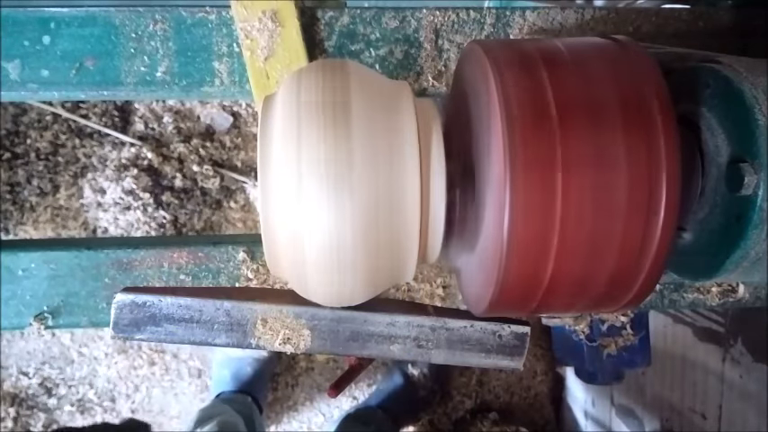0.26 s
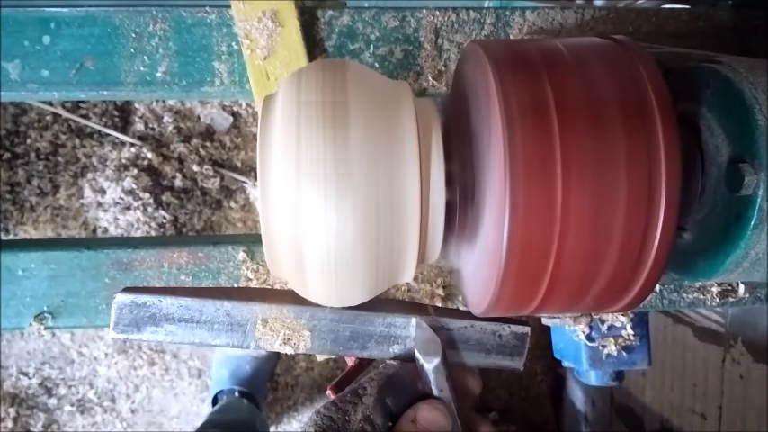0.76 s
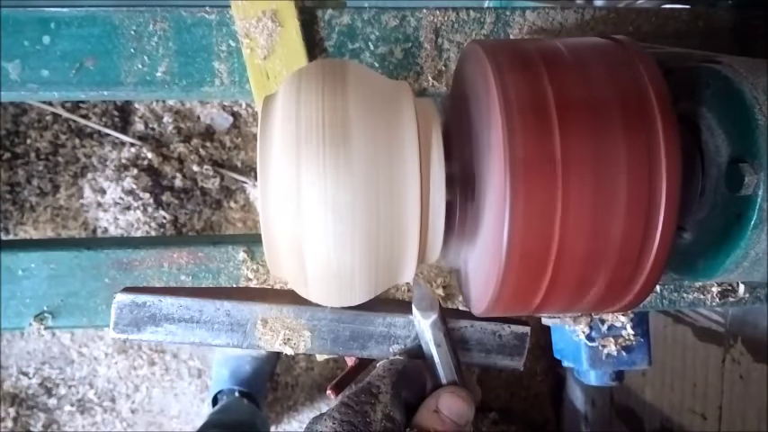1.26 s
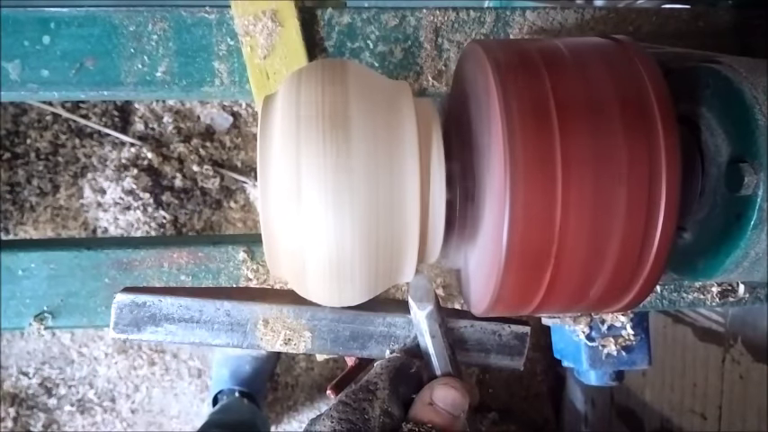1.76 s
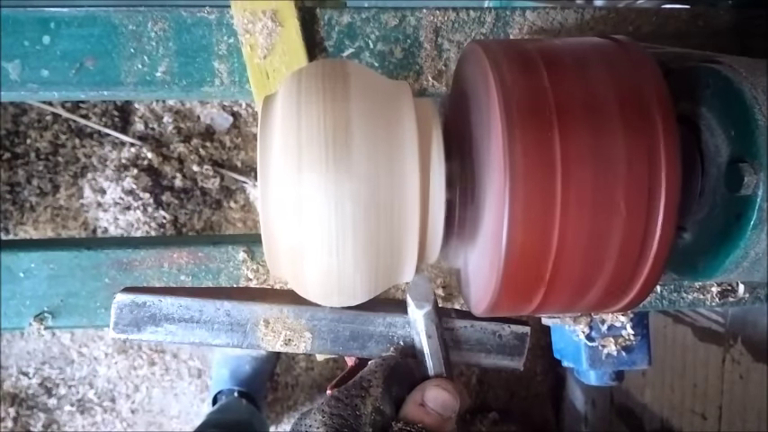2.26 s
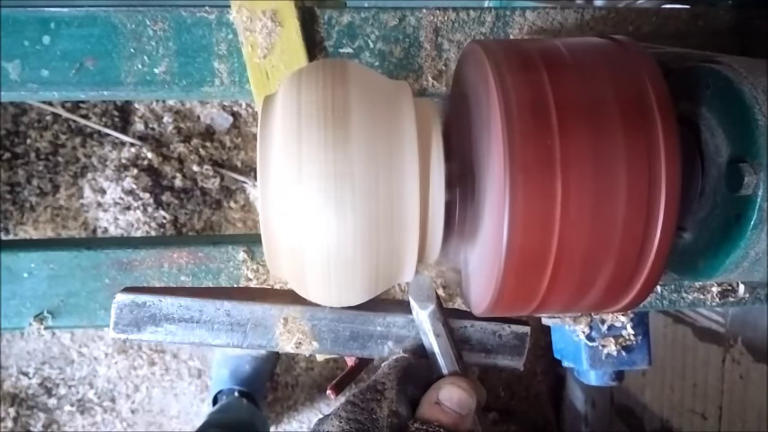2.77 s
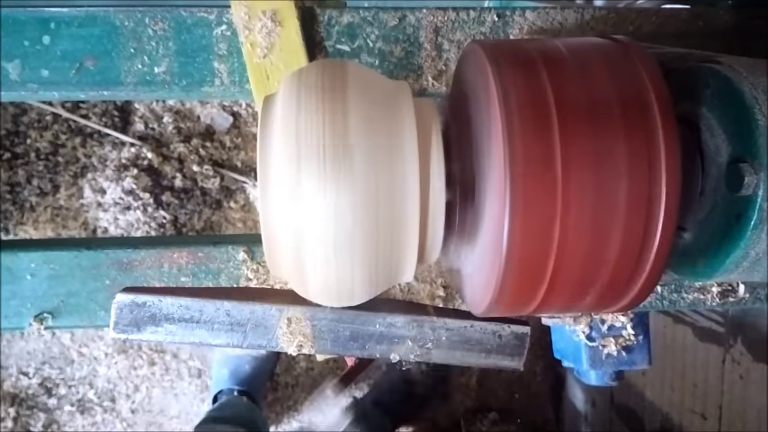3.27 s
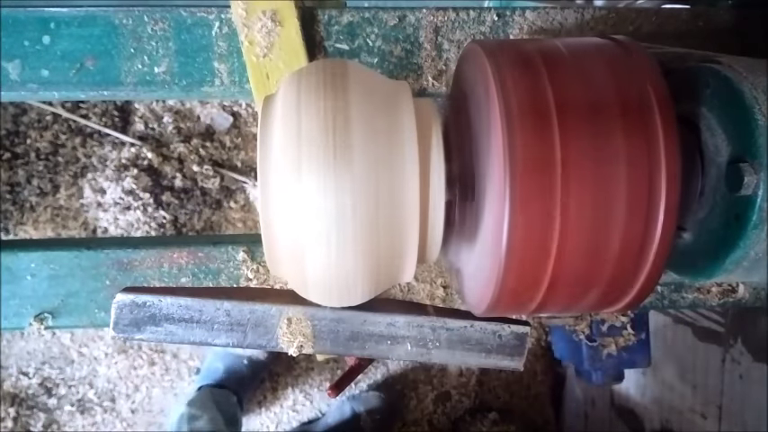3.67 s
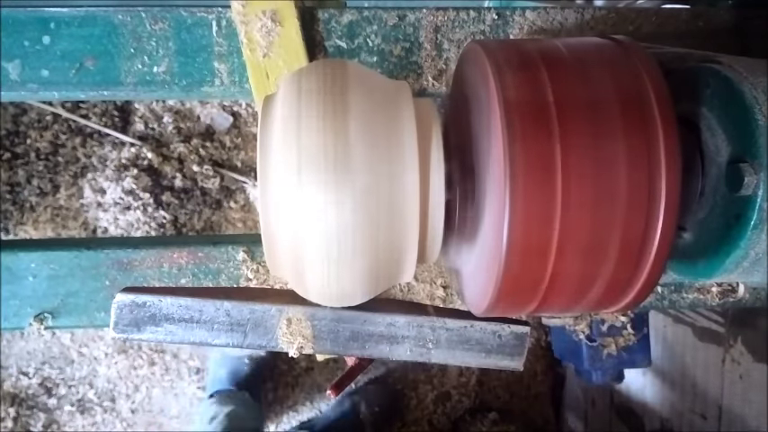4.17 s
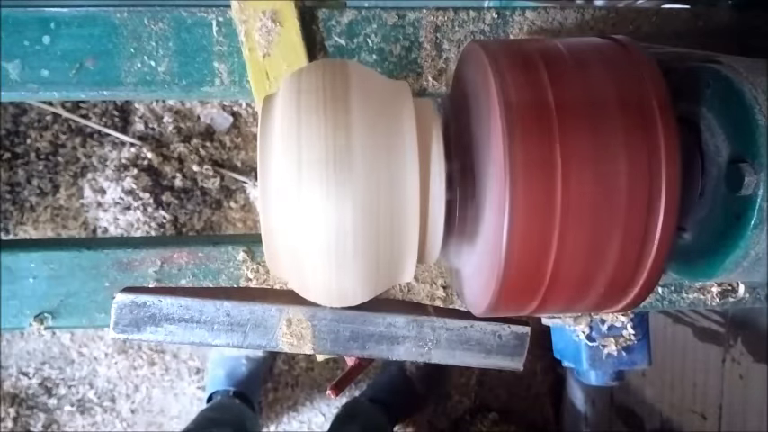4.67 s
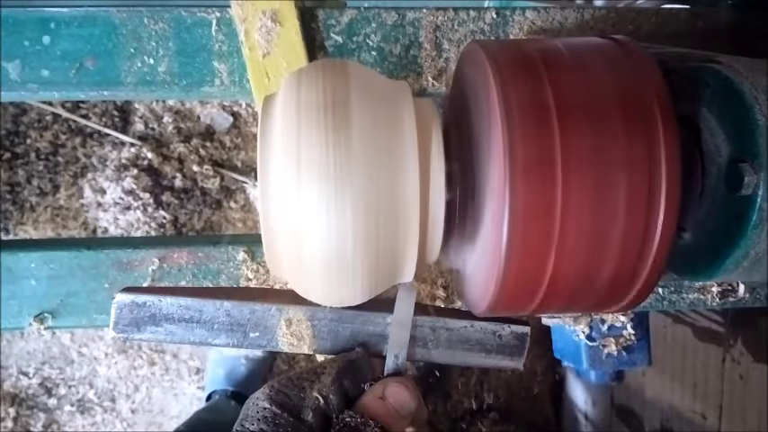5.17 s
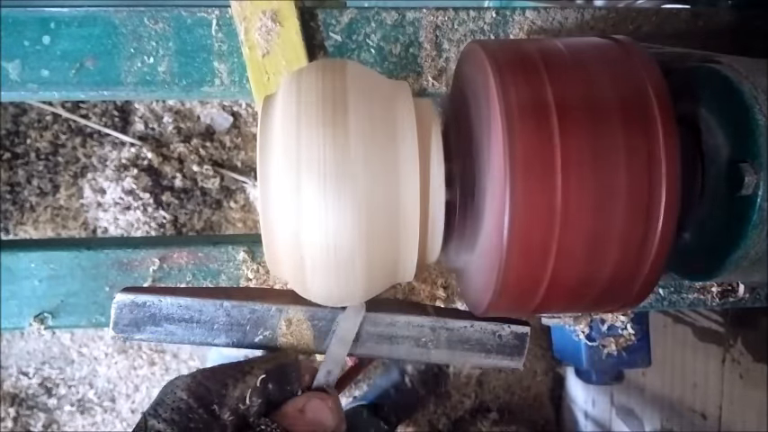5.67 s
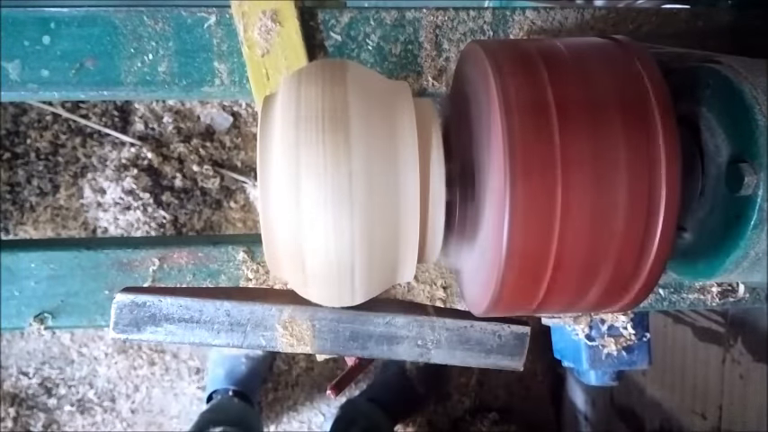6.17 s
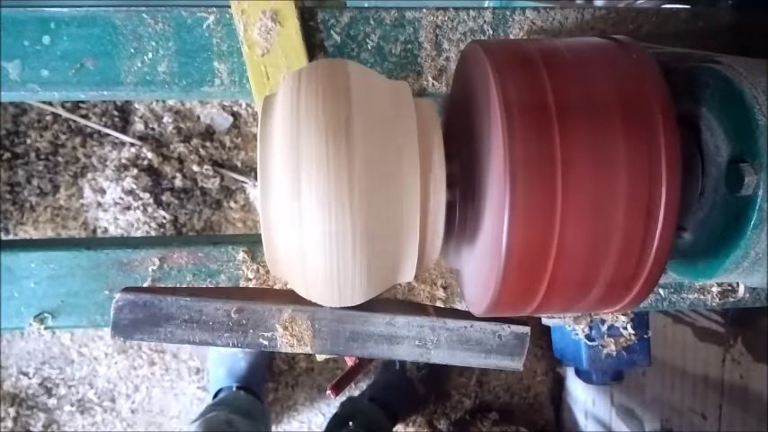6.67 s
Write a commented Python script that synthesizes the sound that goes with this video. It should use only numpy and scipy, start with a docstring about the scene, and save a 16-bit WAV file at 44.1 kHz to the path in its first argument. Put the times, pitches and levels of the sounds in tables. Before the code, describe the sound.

A wood lathe runs close by in a small workshop, its motor humming and whining and a worn bearing rattling with a hiss. A steel tool scrapes the spinning wood in a string of short, raspy strokes. After a pause and a tiny snap, a thinner blade rasps and squeals briefly. Near the end the power cuts and the lathe begins to slow with two faint squeaks.

```python
"""Wood lathe in a small workshop

A stereo pair of microphones hears a belt-driven lathe: the motor hums and whines, a worn bearing
rattles and sings. A steel scraper meets the spinning wood in short strokes, rasping once per turn and
chattering where it digs in. The machine's hiss flares briefly on the beat of spindle and pulley, a chip
snaps, and a thinner blade takes over and squeals. Near the end the power is cut and the spindle coasts
down with two squeaks."""
import sys
import numpy as np
from scipy import signal
from scipy.fft import rfft, irfft, next_fast_len
from scipy.io import wavfile
from scipy.ndimage import uniform_filter1d

SR = 44100
rng = np.random.default_rng(int(sys.argv[2]) if len(sys.argv) > 2 else 0)


def wav_record(signal):
    """Record a signal, one row per channel, as 16-bit PCM in the file named by sys.argv[1]."""
    frames = np.transpose(np.atleast_2d(signal))
    bounded = np.clip(frames, -1, 1)
    # unit amplitude maps onto the largest positive 16-bit level
    quanta = np.round(bounded * 32767).astype(np.int16)
    wavfile.write(sys.argv[1], SR, quanta)


N = 305167
TIME = np.arange(N) / SR
FFT_SIZE = next_fast_len(N, True)
FREQS = np.maximum(np.fft.rfftfreq(FFT_SIZE, 1 / SR), 1)
SPINDLE_HZ, PULLEY_HZ, BALL_PASS_HZ = 74.8, 66.35, 171.6   # at full speed
POWER_OFF_S, COAST_S = 6.453, 1.6   # the power is cut; time constant of the slowing


def from_db(db):
    """Decibels to gain."""
    return 10 ** (np.asarray(db) / 20)


def rms_one(x):
    """Scale to unit power."""
    return x / np.sqrt(np.mean(x ** 2) + 1e-20)


def at_hz(points):
    """A curve through the points, at every frequency."""
    hz, value = np.transpose(points)
    return np.interp(np.log(FREQS), np.log(hz), value)


def drift(rate_hz):
    """A slow random wander of spread 1."""
    step, run_in = 40, 2000
    pole = np.exp(-2 * np.pi * rate_hz * step / SR)
    noise = rng.standard_normal(N // step + run_in + 2)
    slow = signal.lfilter([1], [1, -2 * pole, pole * pole], noise)[run_in:]
    return np.interp(np.arange(N) / step, np.arange(len(slow)), rms_one(slow))


def swell(at_s, half_width_s):
    """A bell-shaped bump of height 1."""
    return np.exp(-.5 * ((TIME - at_s) / half_width_s) ** 2)


def body(spectrum, resonances=()):
    """Gain per frequency: a broad slope with resonant peaks on it."""
    peaks = sum((from_db(db) ** 2 - 1) / (1 + (2 * (FREQS - hz) / width) ** 2)
                for hz, width, db in resonances)
    return from_db(at_hz(spectrum)) * np.sqrt(np.maximum(1 + peaks, .1))


def modes(resonances):
    """Gain per frequency of a few resonances with dark valleys between them."""
    return np.sqrt(sum(from_db(db) ** 2 / (1 + (1.26 * (FREQS - hz) / width) ** 2) ** 2
                       for hz, width, db in resonances))


def friction(per_s, spread_db):
    """Two streams of tiny impacts of uneven size, with unit power per Hz."""
    hits = rng.random((2, N)) < per_s / SR
    sizes = from_db(spread_db * rng.uniform(-0.96, 1, (2, N))) * rng.standard_normal((2, N))
    return rms_one(hits * sizes) * np.sqrt(SR / 2)


def turns(hz, speed, wobble):
    """Revolutions made so far at a slightly unsteady speed."""
    return np.cumsum(hz * speed * (1 + wobble * drift(3.05))) / SR


def once_per_turn(angle, sharpness, depth):
    """A gain of unit power that jumps up once in every revolution and dies away."""
    return rms_one(1 + depth * np.exp(-sharpness * (angle % 1)))


def tones(lines, angle, rough, flutter_hz):
    """Partials locked to a rotation, shaken in level and phase: a direct stream and a scattered one."""
    out = np.zeros((2, N))
    for multiple, db in lines:
        phase = 2 * np.pi * (multiple * angle + rng.random())
        along, across = np.cos(phase), np.sin(phase)
        direct = (1 + rough * drift(flutter_hz)) * along + rough * drift(flutter_hz) * across
        scattered = drift(flutter_hz) * along
        out += np.sqrt(2) * from_db(db) * np.array([direct / np.sqrt(1 + 2 * rough ** 2), scattered])
    return out


# how alike the two microphones sound: (frequency [Hz], likeness [ratio, capped at 1])
MIC_LIKENESS = [(60, 1.1), (400, 0.9), (1300, 1), (2000, 1), (2600, 1), (3000, 0.44), (3800, 0.3),
                (5600, .5), (6400, 0), (16000, 0)]
# balance across the pair: (frequency [Hz], left minus right [dB])
MIC_BALANCE = [(60, -2), (350, 2.5), (700, 1), (2100, 1.5), (2650, -2.5), (3300, 4.5), (5500, 0),
               (7500, 2.5), (10000, -.5), (13000, 0.5), (14400, -3), (16000, 4.5)]
# phase lag at the left microphone: (frequency [Hz], lag [rad])
MIC_LEFT_LAG = [(60, -2), (500, 0.07), (1200, 0.3), (1720, 0.47), (2600, 1.45), (3300, 1.8), (4300, 2.5),
                (6000, 3)]

def radiate(force, gain):
    """Two force streams ring a body and reach the microphones, alike in the bass, diffuse in the treble."""
    mid, side = rfft(force, FFT_SIZE) * gain
    alike = np.clip(at_hz(MIC_LIKENESS), -1, 1)
    sign = np.array([[1], [-1]])   # left, right
    pair = np.sqrt((1 + alike) / 2) * mid + sign * np.sqrt((1 - alike) / 2) * side
    placing = from_db(sign * at_hz(MIC_BALANCE) / 2) * np.exp(-1j * sign * at_hz(MIC_LEFT_LAG) / 2)
    return irfft(pair * placing, FFT_SIZE)[:, :N]


def workshop(x, wet_db, t60):
    """Dense reflections from lathe bed, floor and nearby walls, different at each microphone."""
    age = np.arange(SR // 3) / SR
    echoes = rng.standard_normal((2, len(age))) * from_db(-60 * age / t60) * (age > .002)
    echoes *= from_db(wet_db) / np.sqrt(np.sum(echoes ** 2, axis=1, keepdims=True))
    return (x + signal.fftconvolve(x, echoes, axes=1)[:, :N]) / np.hypot(1, from_db(wet_db))


# hum of motor and drive: (frequency [Hz], level [dB])
MOTOR_HUM = [(133, -89), (324.2, -66), (333, -72), (379, -71), (400.1, -60), (467, -65.5), (475.6, -68),
             (526, -84), (532.5, -62), (541, -72), (627, -76.5), (665, -73.5), (686, -78), (800.2, -68.5),
             (866, -73.5), (932, -75.5), (1124.5, -66.5), (1475, -75), (1609, -75)]
# the motor's whine: (frequency [Hz], level [dB])
MOTOR_WHINE = [(1200.3, -61)]
# swells of the whine: (time [s], rise [dB])
WHINE_SURGES = [(.25, 6.5), (1.45, 6), (2.9, 3), (3.9, 4), (5.2, 3.5), (5.87, 5.5)]
# casing resonance that the whine excites: (frequency [Hz], width [Hz], level [dB])
CASING_MODES = [(1199, 42, -79.5)]
HUM_DIP_DB, HUM_DIP_S = 2.5, 0.23   # the hum sinks under the scraper; time it takes to follow

def motor(speed):
    """Hum and whine last while the power is on and end in a short low groan; cutting damps the hum."""
    powered = np.clip((POWER_OFF_S - TIME) / .04, 0, 1)
    angle = turns(1, speed, wobble=0.001005)
    cutting = uniform_filter1d(from_db(pressure_db()), size=int(HUM_DIP_S * SR))
    dip = from_db(0.46 - HUM_DIP_DB * cutting / cutting.max())
    hum = tones(MOTOR_HUM, angle, rough=0.21, flutter_hz=9.8) * dip
    surge = from_db(-3.5 + sum(db * swell(at_s, .19) for at_s, db in WHINE_SURGES))
    whine = tones(MOTOR_WHINE, angle, rough=0.7, flutter_hz=9.3) * surge
    groan = from_db(-46) * swell(6.455, 0.0148) * np.sin(2 * np.pi * 378 * TIME)
    casing = radiate(friction(4000, spread_db=1.0) * surge * powered, modes(CASING_MODES))
    return radiate((hum + whine) * powered + groan * [[1], [0]], gain=1) + casing


# rolling noise of the machine: (frequency [Hz], level [dB])
ROLLING_SPECTRUM = [(25, -102), (65, -92.5), (110, -101), (195, -108), (270, -99.5), (330, -89),
                    (600, -83.5), (900, -89.5), (1420, -88.5), (2000, -84.5), (3800, -85), (4200, -86),
                    (5700, -86.5), (7000, -91), (8400, -88.5), (11400, -95.5), (16000, -98)]
# resonances of headstock and bed: (frequency [Hz], width [Hz], boost [dB])
HEADSTOCK_MODES = [(230, 17.5, 8), (670, 28, 2.5), (1066.6, 43, 8), (1087, 74, 6), (1220, 115, 5),
                   (1620, 71, 4), (1700, 29.5, 1), (2180, 53, 2.5), (8400, 330, 1.5), (13100, 460, 4.5),
                   (14950, 100, 7.5)]
# wood and pulley turn at slightly different rates, so the hiss beats
BEAT_HZ, BEAT_CREST_S, BEAT_DB = 9.25, 4.155, 0.67
CROSSOVER_HZ = 6500   # rumble below, hiss above

def rolling(shaking, speed):
    """Rolling balls shake the headstock: a rumble, and a fine hiss that fades faster as the speed drops."""
    headstock = body(ROLLING_SPECTRUM, HEADSTOCK_MODES)
    coarse = friction(25000, spread_db=2.5) * shaking * from_db(.5 * drift(22))
    rumble = radiate(coarse, headstock / np.hypot(1, (FREQS / CROSSOVER_HZ) ** 3))
    beat_db = BEAT_DB * np.cos(2 * np.pi * BEAT_HZ * (TIME - BEAT_CREST_S)) * (TIME < POWER_OFF_S)
    fine = friction(16000, spread_db=4.5) * shaking * speed ** 2 * from_db(beat_db + 0.78 * drift(25))
    hiss = radiate(fine, headstock / np.hypot(1, (CROSSOVER_HZ / FREQS) ** 3))
    return rumble + hiss


# the balls shift their load from race to housing: (start [s], end [s], share [0-1])
LOAD_SHIFTS = [(0, .6, 0.76), (3.405, 4.55, 0.9), (5.5, 6.45, 0.47)]
# resonances of housing and race: (frequency [Hz], width [Hz], level [dB])
HOUSING_MODES = [(2060, 70, -85), (2190, 100, -83), (2578, 65, -75.5)]
RACE_MODES = [(3186, 136, -83.5), (3374, 76, -81.5), (3580, 98, -80), (3790, 125, -83), (3875, 30, -84)]
# tones sung at any load, through the housing and through the race: (ball-pass multiple, level [dB])
STEADY_PARTIALS = [(9, -62.5), (10, -72.5), (11, -70), (14, -68.5), (16, -69)]
HOUSING_PARTIALS = [(12, -69), (15, -64.5)]
RACE_PARTIALS = [(19, -67), (20, -70), (21, -69), (22, -62.5), (23, -81)]
SHIFT_S = 0.29   # time for the load to move over
SLACK_DB, SLACK_S = -4, 0.064   # the rattle drops as the belt goes slack

def bearing(speed):
    """Balls roll over a worn race: noise that throbs with balls and pulley, and a row of singing tones."""
    balls = turns(BALL_PASS_HZ, speed, wobble=0.000692)
    pulley = turns(PULLEY_HZ, speed, wobble=0.00043)
    throb = once_per_turn(balls, sharpness=4, depth=0.17)
    throb *= once_per_turn(pulley, sharpness=1.6, depth=0.38)
    slack = np.clip((TIME - POWER_OFF_S) / SLACK_S + .5, 0, 1)
    rattle = from_db(-0.37 + SLACK_DB * slack) * speed ** 2.7
    shaking = throb * rattle
    noise = rolling(shaking, speed)
    shift = sum(share * np.clip(1 + np.minimum(TIME - start, end - TIME) / SHIFT_S, 0, 1)
                for start, end, share in LOAD_SHIFTS)
    on_housing = from_db(-6.5 + 7.5 * shift + 0.96 * drift(11))
    on_race = from_db(2 - 3.5 * shift + 1.2 * drift(12))
    rings = sum(radiate(friction(4000, spread_db=1.0) * shaking * contact, modes(resonances))
                for resonances, contact in ((HOUSING_MODES, on_housing), (RACE_MODES, on_race)))
    singing = (tones(STEADY_PARTIALS, balls, rough=0.16, flutter_hz=8.8)
               + tones(HOUSING_PARTIALS, balls, rough=0.41, flutter_hz=5.7) * on_housing
               + tones(RACE_PARTIALS, balls, rough=0.46, flutter_hz=6.7) * on_race)
    singing = radiate(singing * rattle * speed ** 6, gain=0.91)
    return workshop(noise + rings, wet_db=-6.5, t60=0.2) + singing


# strokes of the scraper: (start [s], end [s], level at start [dB], level at end [dB])
SCRAPER_STROKES = [(1.505, 1.688, -53, -51.5), (1.8, 1.921, -51, -48), (2.06, 2.199, -49, -48.5),
                   (2.36, 2.375, -48.5, -49), (2.53, 2.66, -56, -52.5), (2.75, 2.859, -52.5, -46.5),
                   (2.93, 3.02, -48.5, -51), (3.095, 3.185, -50, -51), (3.248, 3.3, -52, -48.5),
                   (5.115, 5.145, -49.5, -48), (5.176, 5.22, -53, -55), (5.335, 5.46, -50.5, -44.5),
                   (5.47, 5.79, -46, -50)]
ATTACK_S, RELEASE_S = 0.067, .04   # time to rise and to fall by 20 dB

def pressure_db():
    """In each stroke the edge bites, the hand leans in or eases off, and the edge lifts."""
    strokes = [np.interp(TIME, [start, end], [first_db, last_db])
               - 20 * np.maximum(start - TIME, 0) / ATTACK_S
               - 20 * np.maximum(TIME - end, 0) / RELEASE_S
               for start, end, first_db, last_db in SCRAPER_STROKES]
    return np.maximum(np.max(strokes, axis=0), -120)


# rasp of the first blade and of the second, thinner one: (frequency [Hz], level [dB])
THICK_RASP = [(500, -65), (1100, -42), (2200, -72), (3500, -37), (4500, -40.5), (7700, -39.5),
              (11400, -44.5), (13500, -36), (16000, -46)]
THIN_RASP = [(500, -70), (1200, -45), (2000, -48), (3800, -37.5), (5300, -43), (7500, -42.5), (10000, -41),
             (11700, -43), (16000, -36.5)]
# ringing of each blade: (frequency [Hz], width [Hz], boost [dB])
THICK_MODES = [(5880, 140, 7), (6600, 190, 1), (10100, 640, 8.5), (13260, 640, 1.5), (14400, 450, 6)]
THIN_MODES = [(5960, 200, 8.7), (6500, 350, 2.9), (10060, 950, 8.2), (14200, 500, 3), (16000, 370, 2.6)]
BLADE_CHANGE_S = 4.3

def scraper(speed):
    """Fibres snap under the edge, hardest as the high side of the wood comes round; blade and wood ring."""
    bite = once_per_turn(turns(SPINDLE_HZ, speed, wobble=0.0035), sharpness=7.8, depth=1.04)
    force = friction(30000, spread_db=2.0) * bite * from_db(pressure_db() + 1.94 * drift(26.2))
    thick = radiate(force * (TIME < BLADE_CHANGE_S), body(THICK_RASP, THICK_MODES))
    thin = radiate(force * (TIME >= BLADE_CHANGE_S), body(THIN_RASP, THIN_MODES))
    return workshop(thick + thin + wood_chatter(bite) + blade_squeal(bite), wet_db=-2.0, t60=0.06)


# the blade catches: (time [s], half-width [s], level [dB])
BLADE_CATCHES = [(1.54, 0.02, -59), (2.822, 0.022, -44), (2.9, 0.065, -54.5)]
# resonances of the workpiece: (frequency [Hz], width [Hz], boost [dB])
WOOD_MODES = [(950, 40, 16), (1104, 86, 13), (1290, 90, 4), (1600, 150, 7), (1950, 270, 12.5)]

def wood_chatter(bite):
    """The blade digs in and the workpiece chatters once per turn."""
    dig = sum(from_db(db) * swell(at_s, width) for at_s, width, db in BLADE_CATCHES)
    wood = body([(300, -68), (900, -42.0), (2500, -49.5), (9000, -47)], WOOD_MODES)
    return radiate(friction(20000, spread_db=1) * bite * dig, wood)


# loudest crests of the beat: (time [s], level [dB])
HISS_FLARES = [(4.155, -59), (4.795, -74), (4.91, -66), (6.12, -65), (6.22, -63), (6.315, -59.5)]

def hiss_flares():
    """The machine's hiss flares briefly on the beat of spindle and pulley."""
    level = sum(from_db(db) * swell(at_s, .016) for at_s, db in HISS_FLARES)
    colour = body([(1000, -55), (4000, -44), (9000, -40), (16000, -32)])
    return radiate(friction(30000, spread_db=2) * level, colour)


# a chip hits steel: (time [s], level [dB], decay by 60 dB [s])
CHIP_HITS = [(4.2959, -32, .011)]
# colour of the snap: (frequency [Hz], level [dB])
CHIP_SPECTRUM = [(1000, -55), (6500, -52), (8000, -41), (11000, -43), (16000, -42)]
# its steely ring: (frequency [Hz], width [Hz], boost [dB])
CHIP_MODES = [(8500, 600, 9)]

def chip_snap():
    """A chip snaps against steel: a very short crackle with a bright ring."""
    burst = sum(from_db(db - 60 * np.clip((TIME - at_s) / t60, 0, 3)) * (TIME >= at_s)
                for at_s, db, t60 in CHIP_HITS)
    snap = radiate(friction(30000, spread_db=1) * burst, body(CHIP_SPECTRUM, CHIP_MODES))
    return workshop(snap, wet_db=-10.5, t60=0.15)


# squeals of the thin blade: (time [s], half-width [s], level [dB])
BLADE_SQUEALS = [(5.115, .018, -6), (5.425, 0.033, 1), (5.52, 0.026, -1)]
# resonances it squeals on: (frequency [Hz], width [Hz], level [dB])
FLEX_MODES = [(6050, 180, -76), (6380, 270, -75.5)]

def blade_squeal(bite):
    """The thin blade chatters on its own resonances, in a sharp pulse each turn."""
    flex = sum(from_db(db) * swell(at_s, width) for at_s, width, db in BLADE_SQUEALS)
    return radiate(friction(20000, spread_db=4.5) * rms_one(bite ** 3) * flex, modes(FLEX_MODES))


# ringing of loose parts: (frequency [Hz], width [Hz], level [dB])
LOOSE_MODES = [(373, 29, -88.5), (567, 28, -87.5), (1130, 140, -82.5), (1233, 60, -82), (1710, 270, -85),
               (2050, 67, -86), (2194, 61, -78.5), (2530, 98, -86), (3630, 120, -86)]
# squeaks of the slowing spindle: (time [s], level [dB])
SPINDLE_SQUEAKS = [(6.555, -55), (6.71, -58)]
SQUEAK_HZ = 2211

def coasting(speed):
    """Without drive the loose parts go on ringing, ever more weakly, and the spindle squeaks."""
    free = np.clip((TIME - POWER_OFF_S) / 0.037, 0, 1)
    squeaks = sum(tones([(SQUEAK_HZ, db)], TIME, rough=.4, flutter_hz=21) * swell(at_s, .02)
                  for at_s, db in SPINDLE_SQUEAKS)
    ringing = radiate(friction(1800, spread_db=0) * free * speed ** 2, modes(LOOSE_MODES))
    return ringing + radiate(squeaks, gain=1)


def scene():
    """The lathe at the microphones: full speed until the power is cut, then friction slows it."""
    speed = np.exp(-np.maximum(TIME - POWER_OFF_S, 0) / COAST_S)
    return motor(speed) + bearing(speed) + coasting(speed) + scraper(speed) + hiss_flares() + chip_snap()


def record(dry):
    """Both microphones pass through a steep low-pass that cuts the highest treble."""
    cutoff_hz = 15850
    return signal.sosfilt(signal.ellip(12, .1, 70, cutoff_hz, fs=SR, output="sos"), dry)


dry = scene()
out = record(dry)
wav_record(out)
```